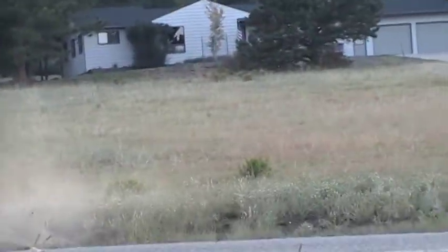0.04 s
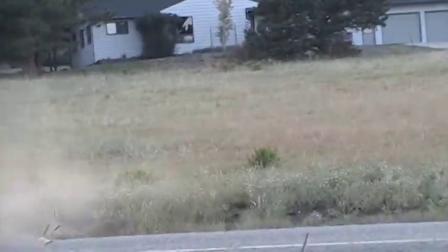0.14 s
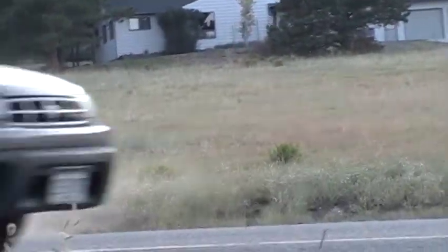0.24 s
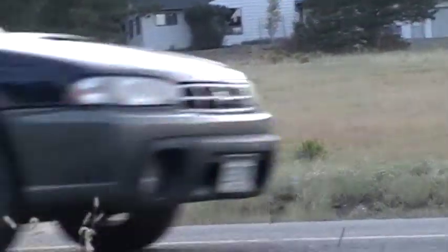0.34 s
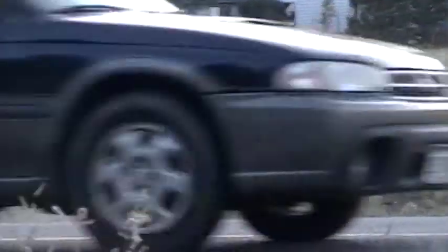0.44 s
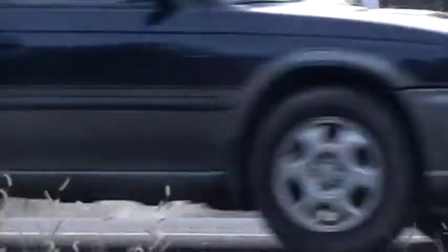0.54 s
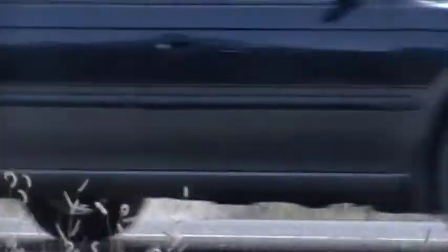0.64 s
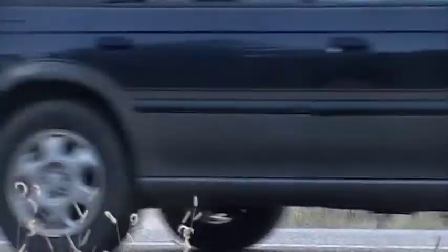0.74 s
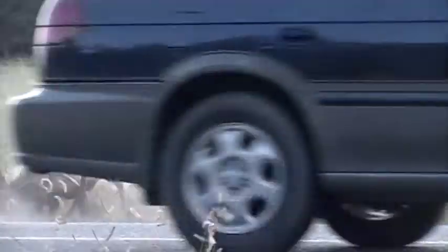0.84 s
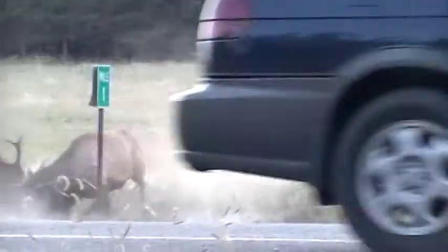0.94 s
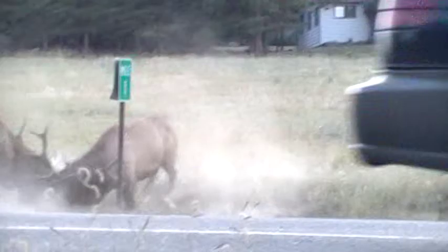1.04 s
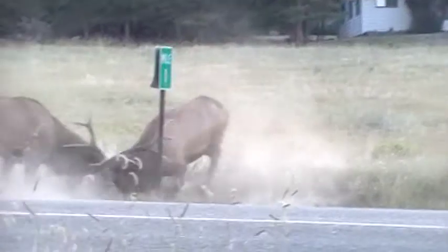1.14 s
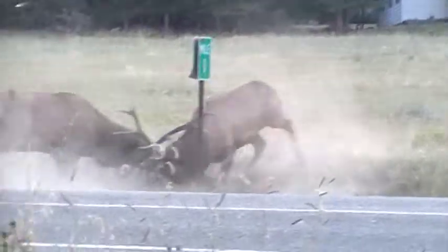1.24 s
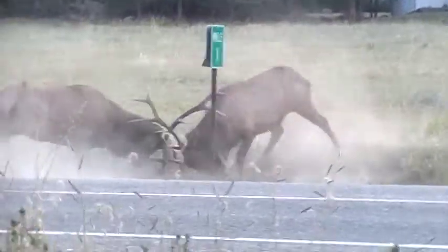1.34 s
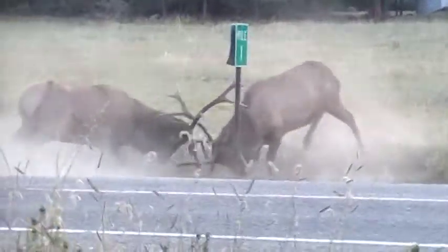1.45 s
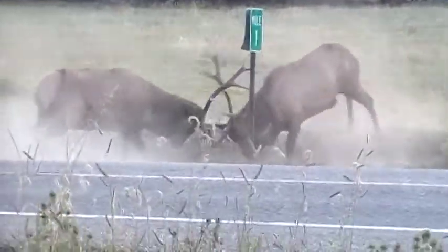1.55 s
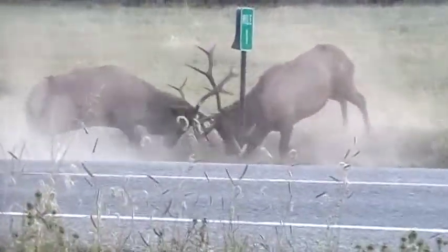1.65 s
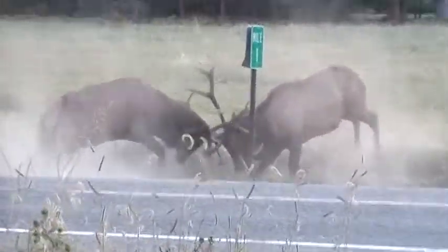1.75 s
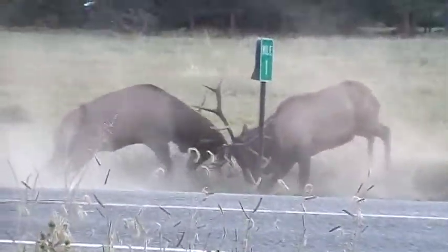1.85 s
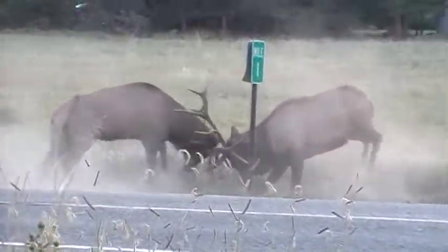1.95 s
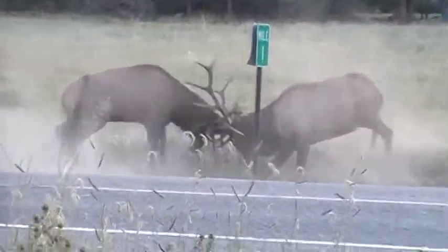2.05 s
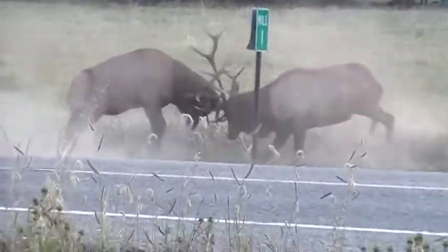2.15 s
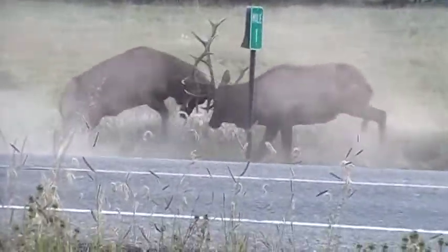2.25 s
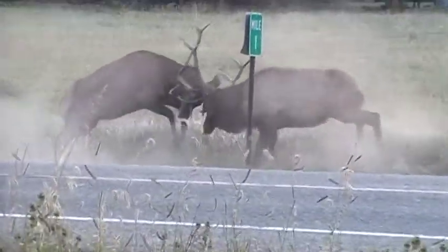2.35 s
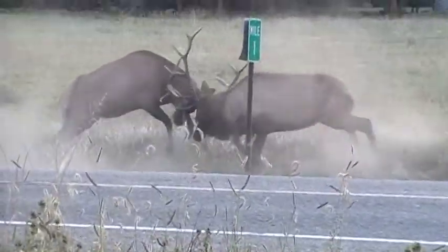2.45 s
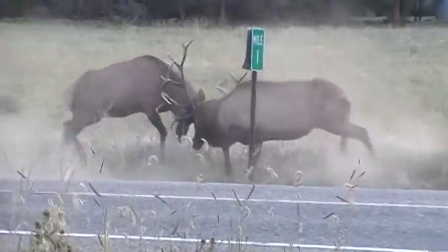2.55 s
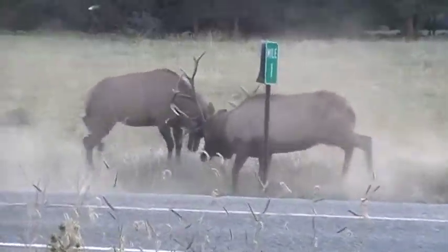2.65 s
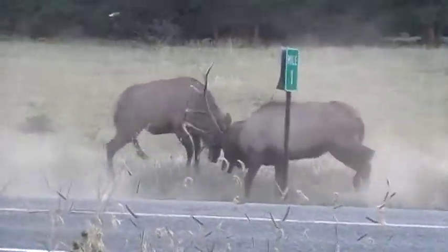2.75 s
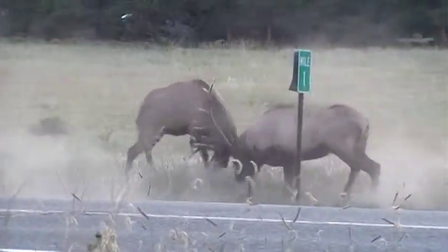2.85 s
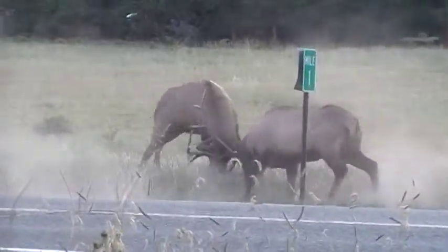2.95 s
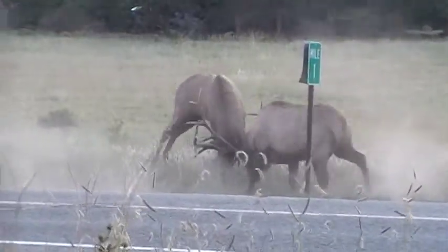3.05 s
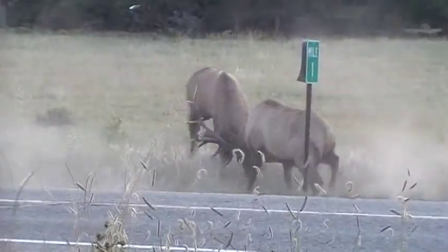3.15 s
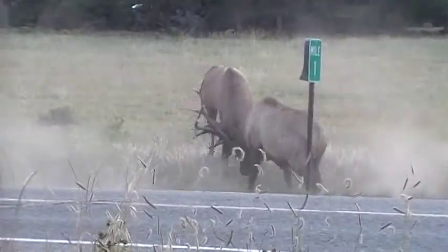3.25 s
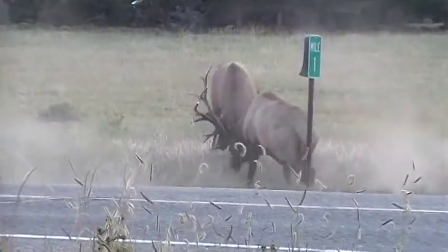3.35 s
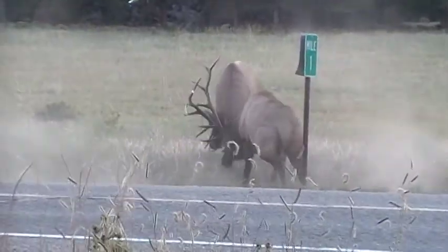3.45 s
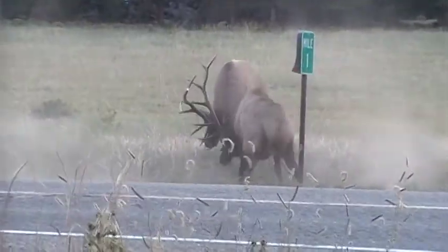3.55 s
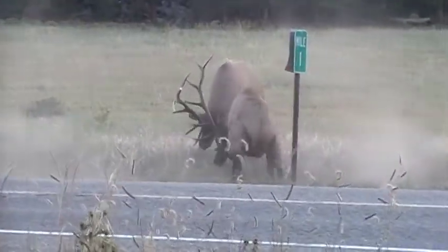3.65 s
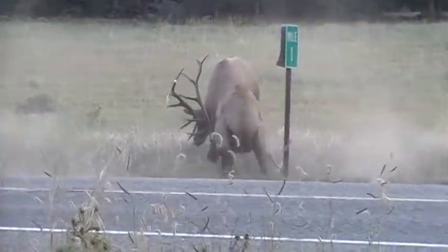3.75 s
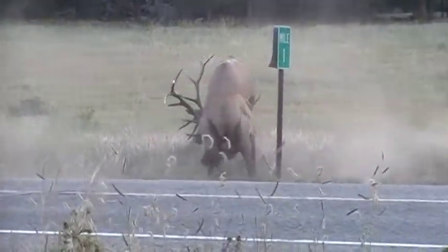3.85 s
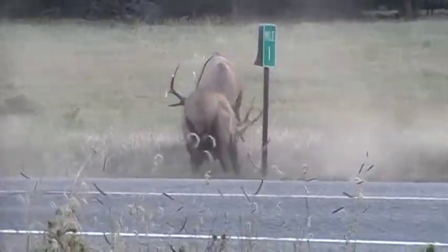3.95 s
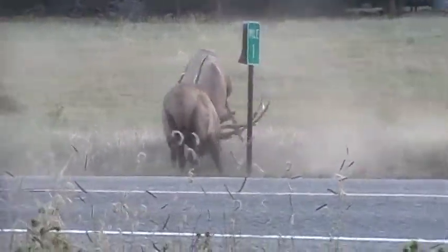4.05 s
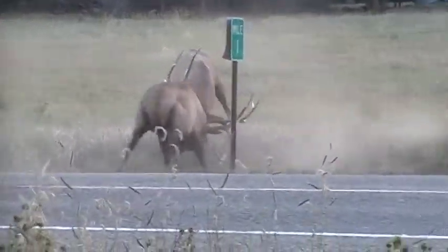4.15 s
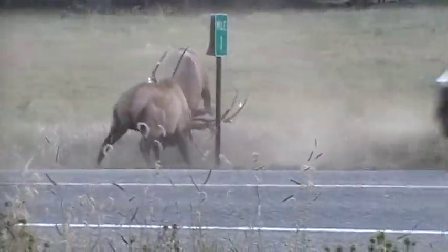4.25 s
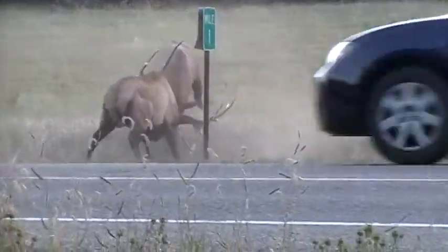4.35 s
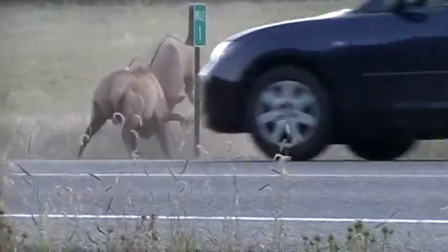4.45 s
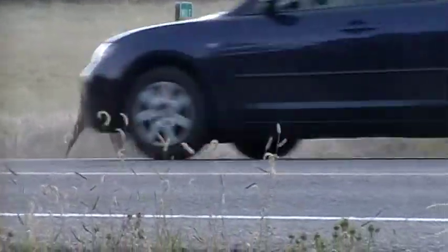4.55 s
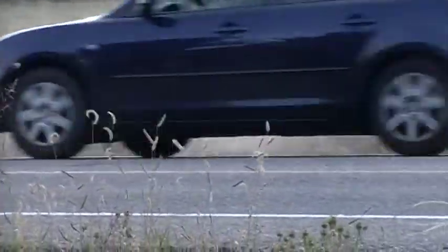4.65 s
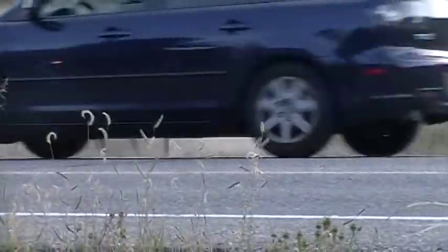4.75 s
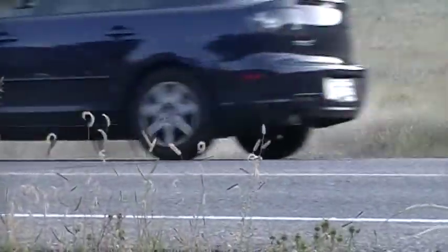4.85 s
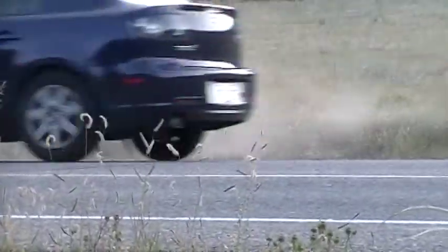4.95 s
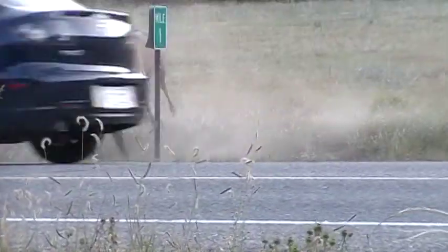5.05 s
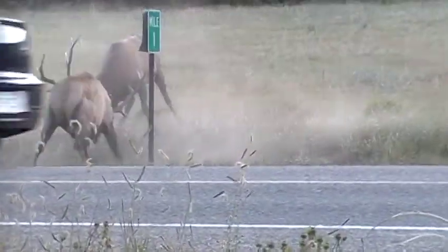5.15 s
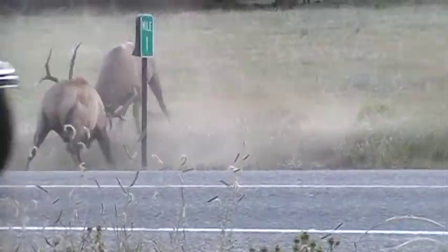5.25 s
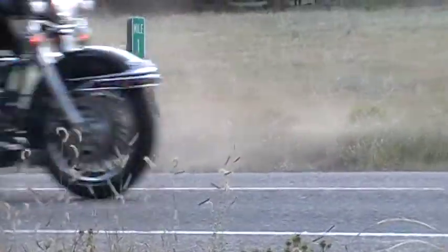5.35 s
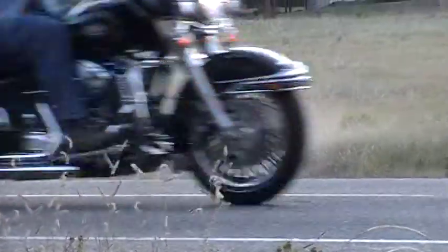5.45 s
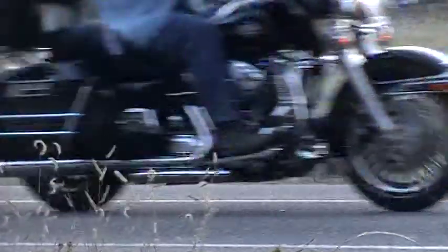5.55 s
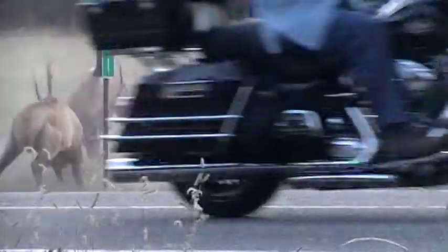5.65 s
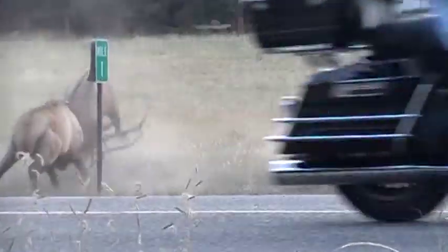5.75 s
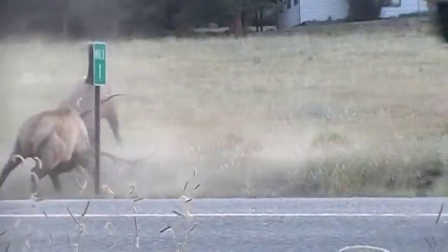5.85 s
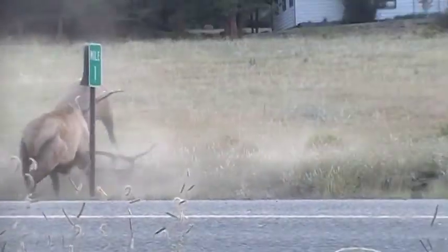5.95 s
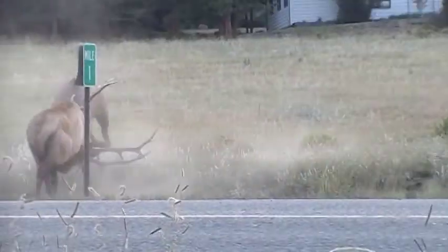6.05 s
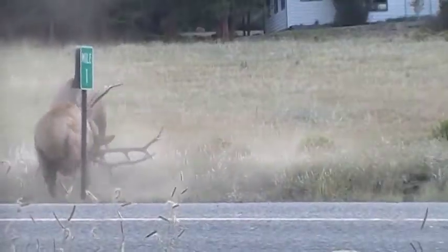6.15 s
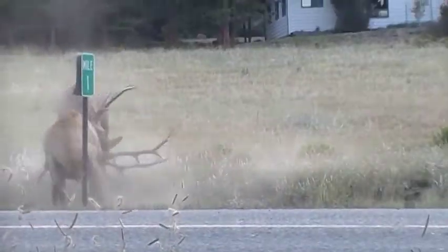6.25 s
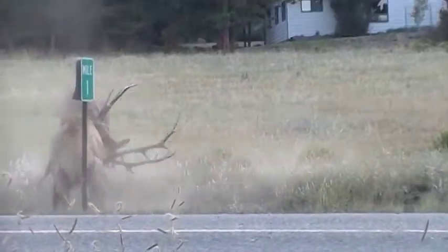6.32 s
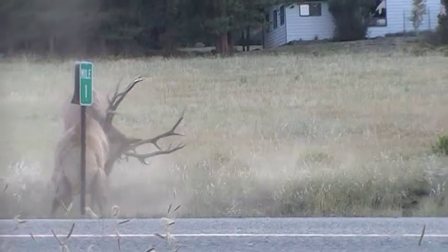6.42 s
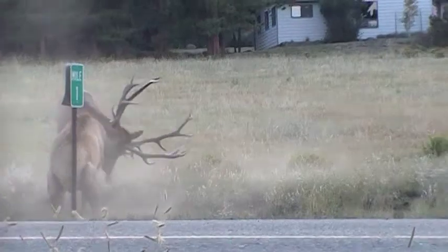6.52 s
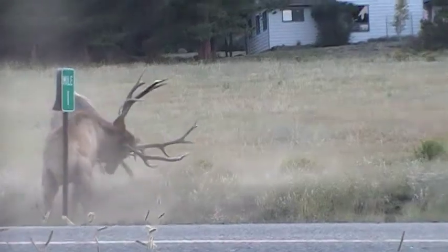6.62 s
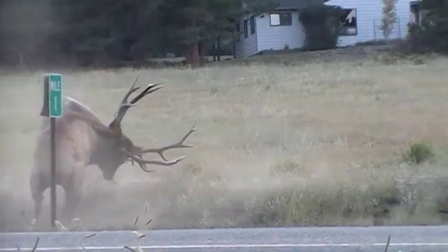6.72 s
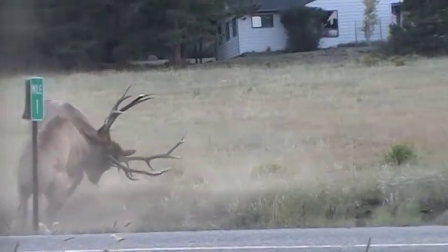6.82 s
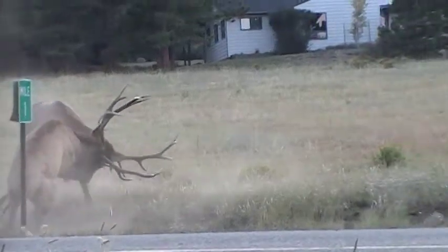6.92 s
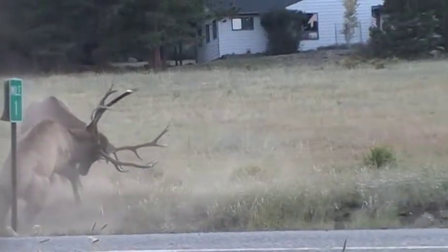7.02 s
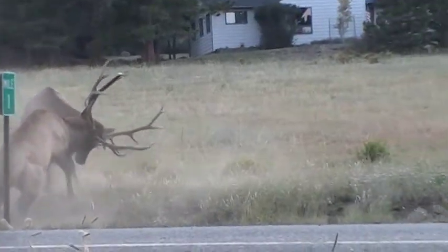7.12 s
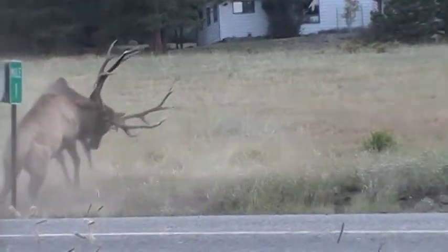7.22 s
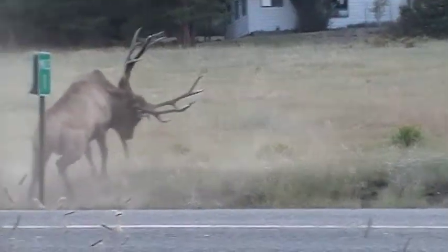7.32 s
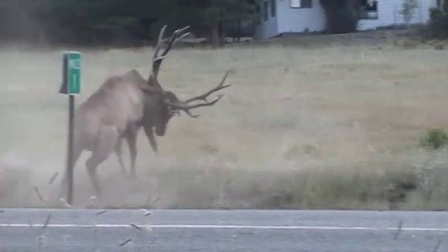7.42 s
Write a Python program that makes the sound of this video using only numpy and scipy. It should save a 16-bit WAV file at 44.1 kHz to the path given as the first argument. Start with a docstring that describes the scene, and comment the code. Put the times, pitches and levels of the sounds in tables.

```python
"""Two bull elk lock antlers in a dry meadow: bursts of contacts ring antler modes; grit and stalks snap.
Across a country road a big twin-cylinder motorcycle idles on the left, pulls away, crosses in front, is
shifted up and goes off to the right: firing pulses ring its pipes, steady orders form its clean pull.
Cars roll slowly past as filtered noise with two wavering tones. Two closely spaced microphone ports
tell direction by a small lag and a level difference."""
import sys
import numpy as np
from scipy import signal
from scipy.io import wavfile
from scipy.ndimage import uniform_filter1d, map_coordinates

SR = 44100
rng = np.random.default_rng(int(sys.argv[2]) if len(sys.argv) > 2 else 0)


def wav_out(sig):
    """Save sig, one row per channel (or a flat mono array), as 16-bit PCM at SR to the path in sys.argv[1]."""
    wavfile.write(sys.argv[1], SR, np.round(np.clip(np.atleast_2d(sig).T, -1, 1) * 32767).astype(np.int16))


N = 329849


def amp(db):
    """Gain of a level in dB."""
    return 10 ** (np.asarray(db) / 20)


def rms_one(x):
    """Scaled to rms 1."""
    return x / np.sqrt(np.mean(x ** 2) + 1e-20)


def evened(x):
    """Level held at rms 1 over a third of a second."""
    return x / np.sqrt(uniform_filter1d(x ** 2, size=SR // 3) + 1e-20)


def in_time(rows):
    """Each column of a curve against start_s, one value a sample."""
    s, *columns = np.transpose(rows)
    return [np.interp(np.arange(N) / SR, s, c) for c in columns]


def drift(rate_hz):
    """Slow random wander of rms 1, computed every 40 samples."""
    r = np.exp(-80 * np.pi * rate_hz / SR)
    white = rng.standard_normal(N // 40 + 2002)
    slow = signal.lfilter([1], [1, -2 * r, r * r], white)[2000:]
    return np.interp(np.arange(N) / 40, np.arange(len(slow)), rms_one(slow))


def butter(x, hz, kind, order=2):
    """Butterworth filter."""
    return signal.sosfilt(signal.butter(order, hz, kind, fs=SR, output="sos"), x)


def resonate(x, modes):
    """Resonances in parallel, each with gain 1 on top before its dB."""
    out = 0
    for hz, width_hz, db in modes:
        r = np.exp(-np.pi * width_hz / SR)
        top = amp(db) * (1 - r * r) / 2
        out = out + signal.lfilter([top, 0, -top], [1, -2 * r * np.cos(2 * np.pi * hz / SR), r * r], x + 1e-18)
    return out


def delayed(x, ms):
    """Delay by a circular shift."""
    return np.roll(x, round(ms * SR / 1000))


def coloured(spectrum, patchy_db):
    """Two unrelated noises in third-octave bands that flicker partly together; rms 1."""
    hz, db = np.transpose(spectrum)
    edges_hz = hz[0] * 2 ** np.arange(0, np.log2(min(hz[-1], 17000) / hz[0]) + .01, 1 / 3)
    out, together, white = 0, drift(2.26), rng.standard_normal((2, 2, N))
    for k, (low, high) in enumerate(zip(edges_hz, edges_hz[1:])):
        level_db = np.interp(np.log(low * high) / 2, np.log(hz), db)
        flicker_db = patchy_db * (together + drift(42))
        out = out + amp(level_db + flicker_db) * butter(white[k % 2], [low, high], "band")
    return rms_one(out)


def placed(x, lag, db_per_sample):
    """A source off to one side reaches the far port later and weaker."""
    # Long waves bend further round the housing: below_hz, lag_factor
    lag_growth = [(1500, 2.1), (4500, 1.4)]
    left, rest, at = 0, x, np.arange(N)
    for hz, growth in lag_growth:
        low = butter(rest, hz, "low", order=1)
        left = left + np.interp(at - growth * lag, at, low)
        rest = rest - low
    left = left + map_coordinates(rest, [at - lag], order=3)
    side = amp(db_per_sample * lag / 2)
    return np.array([left / side, x * side])


def spread(pair, lag, db_per_sample):
    """Direct noise from one direction plus unrelated, duller noise in each port."""
    diffuse_db, diffuse_hz = -2, 2200
    around = butter(pair[1], diffuse_hz, "low", order=1)
    return placed(pair[0], lag, db_per_sample) + amp(diffuse_db) * np.array([around, np.roll(around, N // 2)])


def cars():
    """Slow tyres roar dully, ring their cavity and tread modes, and hiss over road dust."""
    # Tyre levels: start_s, roar_db, hiss_db
    traffic = [(0, -30, -42), (.3, -27, -47.5), (.8, -30, -47), (1.4, -30.5, -47.5), (2.1, -30.5, -57),
               (2.9, -31, -40.5), (3.6, -28.5, -39.5), (4.2, -28.5, -37.5), (5.1, -29, -42.5),
               (5.5, -26.5, -39), (6.1, -30.5, -37.5), (6.6, -25.5, -35), (7.0, -30, -43), (7.48, -31, -49)]
    # Direction: start_s, left_port_lag_samples
    car_lag = [(0, -1.2), (1, 1.8), (1.4, 3.1), (2.2, 3.5), (3, 3), (4.4, 1.6), (5.2, -.5), (6.5, 3),
               (7.48, 3.8)]
    # Noise spectra: hz, density_db
    roar_spectrum = [(150, 7), (250, -0.5), (407, -6), (516, -1), (829, -3), (1130, -3.5), (1890, -8),
                     (2170, -9.5), (4800, -24), (7000, -64), (9100, -24), (15400, -120)]
    hiss_spectrum = [(3000, -20), (5000, 16), (7500, 19.5), (10500, 26.5), (12500, -8), (16000, -79)]
    # Tyre cavity and tread: mode_hz, width_hz, level_db
    tyre_modes = [(420, 60, -4), (650, 60, -8), (835, 70, -4)]
    # Short swishes in the treble hiss: start_s, length_s, db_over_hiss
    swishes = [(0.084, 0.14, 4.5), (0.222, 0.12, 8.5), (.345, 0.12, 7.5), (0.536, 0.15, 7.5)]
    swish_edge_s = 0.033
    # tyre modes are stronger until the first car has gone
    sing_db, sing_near_db, sing_gone_s, sing_fade_s = 9, 4.5, 1.8, 0.097
    roar_trim_db = -1.0

    roar_db, hiss_db = in_time(traffic)
    t = np.arange(N) / SR
    swish_db = 0
    for s, length_s, db in swishes:
        swish_db = swish_db + db * np.clip(np.minimum(t - s, s + length_s - t) / swish_edge_s, 0, 1)
    sing_db = sing_db + sing_near_db / (1 + np.exp((t - sing_gone_s) / sing_fade_s))
    roar = coloured(roar_spectrum, patchy_db=1.0)
    roar = roar + amp(sing_db) * resonate(rng.standard_normal(N), tyre_modes)
    hiss = coloured(hiss_spectrum, patchy_db=3.0)
    noise = roar * amp(roar_db + roar_trim_db) + hiss * amp(hiss_db + swish_db)
    return spread(noise, in_time(car_lag)[0], 0.057)


def whine():
    """Gear whine of the first car falls and fades as it slows; a higher tone wavers."""
    # Wavering tone while the first car goes by: start_s, pitch_hz, level_db
    hum = [(.1, 850, -55), (.15, 852, -34), (.35, 845, -34), (.39, 770, -39), (.52, 815, -35),
           (.6, 850, -43), (.74, 810, -37), (.9, 850, -42), (1.05, 880, -44), (1.25, 860, -60)]
    start_hz, sag_hz_per_s, level_db, end_s, fade_s = 655, 230, -36, .36, .04
    t = np.arange(N) / SR
    hz = np.maximum(start_hz - sag_hz_per_s * t, 100) + 2.5 * drift(8.8)
    gain = amp(level_db + 1.5 * drift(3.7)) / (1 + np.exp((t - end_s) / fade_s))
    falling = gain * np.sin(2 * np.pi * np.cumsum(hz) / SR)
    hum_hz, hum_db = in_time(hum)
    hum_gain = amp(hum_db + 3.5 * drift(12))
    return falling + hum_gain * np.sin(2 * np.pi * np.cumsum(hum_hz + 9 * drift(14)) / SR)


def note(cycles, per_s, rear_late, rear_db, lag, lift_db):
    """Clean firing as multiples of the cycle rate, lined up on the two blasts of each cycle; rms 1."""
    # Four views: order, ahead_db, nearing_db, side_on_db, behind_db
    order_levels = [(2, -17, -34, -17, -24), (3, -31, -14, -13, -27), (4, -5.5, -8, -8, -2.5),
                    (5, -1.5, -1.5, 0.5, -1.5), (6, -32, -17, -8, -10), (7, -4, -4, 2.5, -9.5),
                    (8, -7, -8.5, -9, -5), (9, -3, -3, 3.5, -0.5), (10, -10, -21.5, -27, -7),
                    (11, -18, -12.5, -10, 0), (12, -9, -1, -8, -3), (13, -15.5, -7, -12.5, -5),
                    (14, -9.5, -11.5, -21, -18), (15, -16.5, -8, -15.5, -11), (16, -15.5, -27, -7.5, -22),
                    (17, -16, -9.5, -18.5, -7), (18, -17.5, -10, -7, -15), (19, -18.5, -16.5, -14.5, -29),
                    (20, -22.5, -20, -21, -24)]
    # lag of the four views; share of a wave by which the blast swings to suction
    view_lag, view_turn = (-2.2, -1.3, .8, 3.5), (.14, .31, .42, .36)
    # orders above the table: level in the four views, fall per order
    upper_db, upper_fall_db, top_order = (-20, -17, -25, -22.5), 1.53, 34
    # a silencer mode that opens with the lift
    boom_hz, boom_width_hz, boom_follows = 262, 14, 0.16
    # slow unsteadiness of each order; quick unsteadiness per order number
    waver_db, waver_hz, flutter_db, flutter_hz = 1.6, 2.5, .05, 16
    travel_ms = 8.5     # from valve to pipe mouth

    angle = 2 * np.pi * (cycles - per_s * travel_ms / 1000)
    swing = 2 * np.pi * np.interp(lag, view_lag, view_turn)
    views = [row[1:] for row in order_levels]
    views += [np.subtract(upper_db, upper_fall_db * n) for n in range(top_order - len(order_levels) - 1)]
    out = 0
    for k, view_db in enumerate(views, start=2):
        twin = np.angle(1 + amp(rear_db) * np.exp(-2j * np.pi * k * rear_late))
        boom_db = boom_follows * lift_db * np.exp(-((k * per_s - boom_hz) / boom_width_hz) ** 2)
        unsteady_db = waver_db * drift(waver_hz) + flutter_db * k * drift(flutter_hz)
        gain = amp(np.interp(lag, view_lag, view_db) + boom_db + unsteady_db)
        out = out + gain * np.cos(k * angle + twin - swing)
    return evened(out)


def firing(cycles, per_s, ragged, rear_late, rear_db):
    """One pulse per firing of each cylinder, uneven by chance, with the same power at any speed."""
    # Firings that catch unburnt fuel: start_s, db_over_normal
    pops = [(6.732, 12.5), (6.872, 12)]
    uneven_db = -1 + 3 * ragged     # clean firing, rise when ragged
    pulses, chance = np.zeros(N), rng.standard_normal((2, 400))
    for k, (late, db) in enumerate([(0, 0 * rear_db), (rear_late, rear_db)]):
        count = np.floor(cycles - late + 1).astype(int)
        at = np.flatnonzero(np.diff(count)) + 1
        pulses[at] = amp(db[at] + uneven_db[at] * chance[k, count[at]])
    firings = np.flatnonzero(pulses)
    for s, db in pops:
        pulses[firings[np.argmin(abs(firings - s * SR))]] *= amp(db)
    return rms_one(pulses / np.sqrt(per_s))


def exhaust(lag):
    """Firing pulses and turbulent gas ring the pipes and echo; a clean pull gives way to steady orders."""
    # Engine speed: start_s, four_stroke_cycle_rate_hz
    speed = [(0.0, 8.36), (0.75, 8.53), (1.2, 8.95), (1.55, 10.49), (1.9, 14.85), (2.16, 16.78),
             (2.89, 14.4), (3.15, 14.45), (3.45, 15.3), (3.77, 15.88), (4.2, 17.78), (4.7, 19.13),
             (5.4, 20.46), (6.11, 21.25), (6.35, 17.88), (6.56, 15.28), (6.9, 14.05), (7.06, 14.02),
             (7.48, 14.04)]
    # Idle and a shut throttle burn raggedly: start_s, raggedness_0_to_1
    raggedness = [(0, .8), (1.4, .7), (1.9, 0), (6.1, 0), (6.25, 1), (6.65, .8), (6.95, .6), (7.05, 0),
                  (7.48, 0)]
    # Loudness with throttle and distance: start_s, level_db, upper_mode_lift_db
    engine = [(0, -23.5, 1), (.8, -24, -0.5), (1.4, -20.5, 2.5), (1.7, -22.5, -13), (1.96, -19, 13),
              (2.6, -18, -4), (2.93, -20, 23), (3.27, -18.5, -26), (3.7, -18, 19), (4.27, -16.5, 19),
              (4.45, -18, 2), (4.9, -16, 15), (5.3, -15, 21.5), (6.0, -15, -3), (6.2, -16.5, -1),
              (6.5, -17.5, -5.5), (6.95, -15, -7), (7.1, -16, 0), (7.48, -15.5, -19)]
    # Parked cars and houses: delay_ms, level_db
    far_echoes = [(19, -10), (33, -17.5), (52, -18), (81, -13.5)]
    # Exhaust modes, low to high: mode_hz, width_hz, level_db
    pipes = [[(65, 3.3, 0)], [(77.5, 55, 3.5), (107.8, 6.4, 4)], [(145, 86, 0)], [(181.7, 41, 10), (236, 43, -9)], [(345, 21, -1.4), (372, 150, -1.1)]]
    # Per pipe group: db_under_level, share_of_lift, turn_db_per_lag_sample
    pipe_shares = [(-8.5, -0.68, 0.7), (-1, -0.49, -0.1), (-13, 1.1, 4), (-10.5, 0.33, 3.54),
                   (-17.5, 1.19, 3.5)]
    # Per pipe group: low_hz, high_hz
    pipe_bands_hz = [(40, 55.4), (72, 161), (112, 165), (160, 247), (275, 454)]
    # Per pipe group, a short delay before its modes so the groups' pulses arrive together: delay_ms
    band_delay_ms = [.1, 0.19, 2.36, 5.13, 8.16]
    first_cycle, rear_after = .39, .4375    # crank position at the start; rear fires 315 of 720 degrees late
    # rear pipe mouth is nearer, more so per sample of lag as the bike turns side-on
    rear_early_ms, rear_early_turn_ms = 2.1, .37
    echo_ms, echo_db, echo_follows = 13.75, -14, 0.056     # nearby bodywork; its share of the lift
    # gas roar in the pipe mouth: louder as it faces this way, strong and gusting when ragged
    throat, throat_db, throat_ragged_db = [(550, 230, 0)], -35, 18
    throat_turn_db, throat_gust_db = 2.2, 3.5
    rumble_clean_db, clean_db = -16, 2.5     # ringing pipes recede in a clean pull; clean note over the level

    per_s, ragged = in_time(speed)[0], in_time(raggedness)[0]
    level_db, lift_db = in_time(engine)
    rear_db = np.interp(lag, (-1.5, 3.4), [0.18, -3.5])     # weaker as the bike points away
    early_ms = rear_early_ms + rear_early_turn_ms * np.minimum(lag, 1)
    rear_late = rear_after - per_s * early_ms / 1000
    cycles = first_cycle + np.cumsum(per_s) / SR

    turbulence = amp(8.5 - 4.5 * ragged) * rng.standard_normal(N)
    gas = firing(cycles, per_s, ragged, rear_late, rear_db) + turbulence
    heard = gas + amp(echo_db + echo_follows * lift_db) * delayed(gas, echo_ms)
    heard += sum(amp(db) * delayed(gas, ms) for ms, db in far_echoes)

    gust_db = (throat_ragged_db + throat_gust_db * drift(19.0)) * ragged
    mouth = evened(resonate(resonate(heard, throat), throat))
    rumble = amp(level_db + throat_db + throat_turn_db * lag + gust_db) * mouth
    for (db, share, turn_db), modes, band, ms in zip(pipe_shares, pipes, pipe_bands_hz, band_delay_ms):
        ringing = evened(butter(resonate(delayed(heard, ms), modes), band, "band"))
        rumble = rumble + amp(level_db + db + share * lift_db + turn_db * lag) * ringing
    clean = amp(level_db + clean_db) * note(cycles, per_s, rear_late, rear_db, lag, lift_db)
    return amp(rumble_clean_db * (1 - ragged)) * rumble + (1 - ragged) * clean, cycles


def motorcycle():
    """Exhaust beat, valve and chain noise that swells on each crank turn, and ticks on the shut throttle."""
    # Direction: start_s, left_port_lag_samples
    bike_lag = [(0, -2.5), (3.5, -2.2), (4.5, -1.6), (5, -1), (5.6, .2), (6.2, 2.2), (6.5, 3), (7, 3.5),
                (7.48, 3.8)]
    # Valve and chain clatter: start_s, level_db
    clatter_levels = [(0, -50.5), (2.8, -48.5), (3.9, -40), (4.5, -37), (5.1, -38), (5.45, -33.5),
                      (5.9, -37), (6.5, -38), (6.9, -46.5), (7.48, -44.5)]
    # Clatter spectrum: hz, density_db
    clatter_spectrum = [(450, 11.5), (800, -26), (1400, -42), (2100, -28), (3000, -6), (5500, -12),
                        (8500, -13), (11000, -10.5), (13500, -24.5), (16000, -36)]
    # Casing: mode_hz, width_hz, level_db
    casing = [(2080, 130, 17), (2380, 110, 15), (5290, 80, -4), (8590, 700, -6)]
    casing_near = .5     # casing stands out as the bike nears: share of the clatter's swing
    # one tick a cycle, through the same resonance (hz, width_hz, db) twice
    tick, tick_phase, tick_from_s, tick_to_s = [(2400, 500, 6.5)], .11, 6.27, 6.49

    lag, clatter_db = in_time(bike_lag)[0], in_time(clatter_levels)[0]
    beat, cycles = exhaust(lag)
    noise = coloured(clatter_spectrum, patchy_db=1.0)
    casing_gain = amp(casing_near * (clatter_db - clatter_db.max()))
    noise = noise + casing_gain * resonate(rng.standard_normal(N), casing)
    clatter = noise * amp(clatter_db + 0.28 * np.cos(4 * np.pi * cycles))
    t = np.arange(N) / SR
    turns = np.diff(np.floor(cycles - tick_phase), prepend=0) * (t > tick_from_s) * (t < tick_to_s)
    ticks = resonate(resonate(turns, tick), tick)
    return placed(beat, 2.1 * lag, 0.18) + spread(clatter, lag, 1.0) + placed(ticks, lag, 0.41)


def strikes(events, modes, bounces_per_s, decay_s, octaves, gain_db, lag):
    """Each blow is a short burst of contacts; it rings most the modes near its brightest pitch."""
    size, bounce_share = 900, .65     # burst samples; later contacts reach this share of the first
    fade = np.exp(-np.arange(size) / (decay_s * SR))
    draws = rng.random((len(events), 2, size))
    bursts = (draws[:, 0] < bounces_per_s / SR) * (2 * draws[:, 1] - 1) * fade * bounce_share
    bursts[:, 0] = 1
    strengths_db = rng.normal(0, 0.93, (len(events), len(modes)))
    out = np.zeros((2, N + size))
    for m, (hz, db, t60_s) in enumerate(modes):
        clicks = np.zeros((2, N + size))
        for e, (s, level_db, bright_hz, pan_db) in enumerate(events):
            off_db = -6 * min(abs(np.log2(hz / bright_hz)) / octaves, 4)
            sides_db = np.array([[.5], [-.5]]) * pan_db
            gains = amp(level_db + db + off_db + strengths_db[e, m] + gain_db + sides_db)
            start = round(s * SR)
            clicks[:, start:start + size] += gains * bursts[e]
        r, w = amp(-60 / (t60_s * SR)), 2 * np.pi * hz / SR
        out += signal.lfilter([0, np.sin(w)], [1, -2 * r * np.cos(w), r * r], clicks + 1e-18)
    return np.array([np.roll(out[0], lag), out[1]])[:, :N]


def snapping():
    """Grit and dry stalks snap: tiny bits ring about thirty cycles to -60 dB."""
    # Snaps, levels before the common gain: start_s, level_db, brightest_hz, left_over_right_db
    snaps = [(0.0344, -40.5, 4350, -8), (0.2513, -16, 10400, 22), (0.312, -20, 4220, 28),
             (0.3973, -19, 10600, 28), (0.5707, -11, 4180, 7), (0.6404, -20, 4130, 21),
             (0.876, -28, 4030, 4), (1.1744, -14, 9800, 1.5), (1.2385, -22, 10200, 3),
             (1.4237, -26, 5930, 28), (2.6514, -21, 9000, 7), (2.974, -15.5, 5470, 2),
             (3.046, -20, 10800, -0.5), (3.178, -21, 4440, 0.5), (3.3867, -23, 4190, -3),
             (3.4165, -19, 4110, 0), (4.8958, -31, 10800, 2.5), (4.997, -23, 10900, 18),
             (5.3462, -22, 5700, 26), (6.9002, -24, 9100, 20), (7.0883, -29, 4470, 21),
             (7.1851, -24, 10100, 17)]
    chips = [(hz, 0, 30 / hz) for hz in np.geomspace(4200, 14000, 7)]
    return strikes(snaps, chips, 900, 0.014, 0.64, gain_db=-14.0, lag=0)


def antlers():
    """Antler on antler: dense contacts ring the short-lived modes of the tines."""
    # Knocks, levels before the common gain: start_s, level_db, brightest_hz, left_over_right_db
    knocks = [(0.2714, -25, 1780, 14), (0.2934, -15, 1300, 11), (0.9198, -26, 2150, 16),
              (1.175, -16, 1750, 5), (1.5335, -23, 2170, 7), (1.541, -26, 2300, 5), (1.550, -21, 2020, 5),
              (1.558, -23, 1500, 5), (1.564, -24, 2200, 5), (1.5695, -16, 4200, 0), (1.5735, -13, 2100, 2),
              (1.5774, -19, 1550, 4), (1.5848, -14, 1120, -4), (1.5967, -10, 2050, 7),
              (1.6045, -10, 2580, 2), (1.6072, -5.5, 2940, -2), (1.615, -12.5, 2700, -2),
              (1.619, -20, 1000, -2), (1.6317, -7.5, 2850, 5), (1.7439, -17, 4200, 4),
              (1.7685, -13, 3800, 3), (1.7775, -23, 2500, 4), (1.7995, -24, 3800, 3),
              (1.8110, -21, 4300, 5), (1.8135, -15.5, 1970, 5), (1.8781, -15, 1470, 2),
              (2.9726, -21.5, 1520, 2), (3.0455, -22.5, 1340, 0), (3.1775, -17, 1750, 2),
              (3.457, -33, 1500, -23), (3.9935, -9.5, 4400, 2), (3.9945, -23, 1900, -3),
              (4.0226, -25, 3400, 10), (4.0245, -17, 2100, 8), (4.0697, -16, 1200, 8),
              (4.076, -23, 1000, 5), (4.0850, -12, 940, 4), (4.091, -22, 1200, 4), (5.5144, -20, 2410, 14),
              (5.651, -10.5, 2390, 7), (5.6794, -12, 2060, 9), (5.7848, -4.5, 2560, 2),
              (6.1754, -30, 1450, -2.0), (6.2515, -16, 1040, -4), (6.2555, -23, 1120, -8),
              (6.2615, -17, 2400, -4), (6.316, -20, 1150, -4), (6.449, -30, 1000, -5),
              (6.506, -16, 1190, -9), (6.5010, -14.5, 2700, 3), (6.8592, -19, 1300, -10),
              (7.3711, -21, 2010, 9)]
    # Antler modes: mode_hz, level_db, t60_s
    tines = [(834, 0.5, 0.25), (940, 10.5, 0.018), (1220, 5.5, 0.0076), (1500, 1, 0.0081),
             (1870, 10.5, 0.0084), (2160, 2, 0.012), (2570, 3, 0.014), (3000, -0.5, 0.015),
             (3170, -14, 0.013), (3870, -10, 0.016), (4130, -4, 0.016), (5600, -9, 0.0067),
             (6640, -7, 0.0076), (8300, -12, .005)]
    return strikes(knocks, tines, 6000, 0.0059, 0.45, gain_db=-15.0, lag=1)


def scene():
    """All sources at the two ports."""
    return cars() + whine() + motorcycle() + snapping() + antlers()


def record(dry):
    """Wind filter under the bass, a left port that is fuller in the bass, rounded peaks, top cut."""
    low_cut_hz, left_bass_db, left_bass_hz, cutoff_hz = 57.3, 3.5, 500, 16200
    x = butter(dry, low_cut_hz, "high", order=4)
    x[0] += (amp(left_bass_db) - 1) * butter(x[0], left_bass_hz, "low", order=1)
    x = 1.033 * np.tanh(x / 1.353)
    return signal.sosfilt(signal.cheby2(16, 50, cutoff_hz, fs=SR, output="sos"), x)


dry = scene()
out = record(dry)
wav_out(out)
```